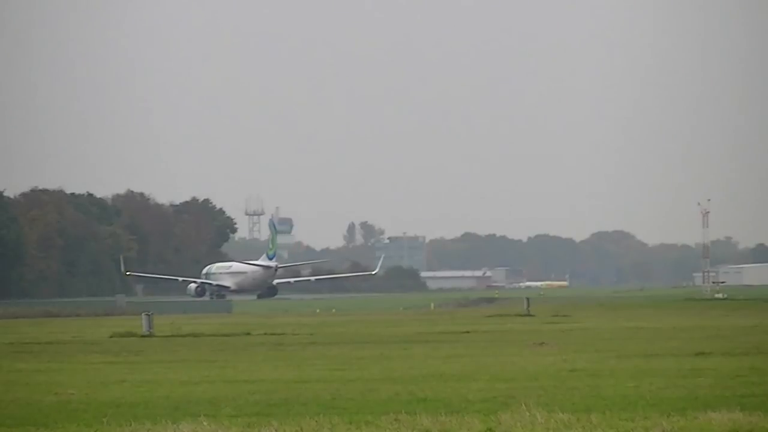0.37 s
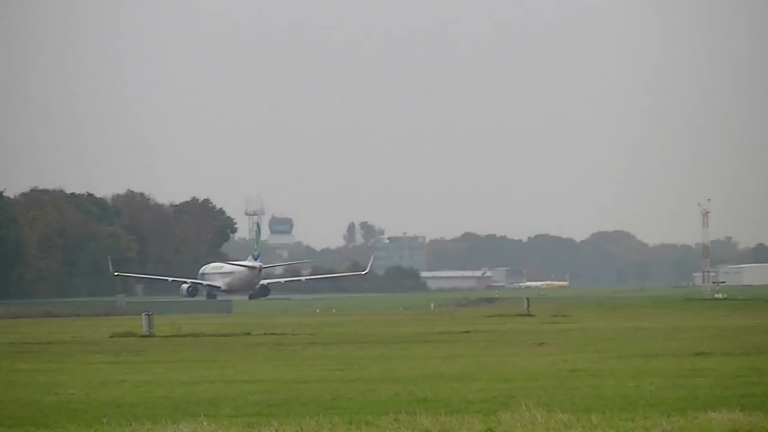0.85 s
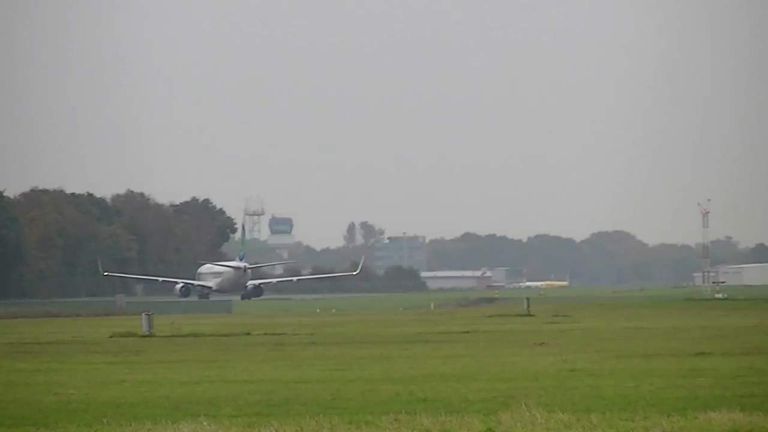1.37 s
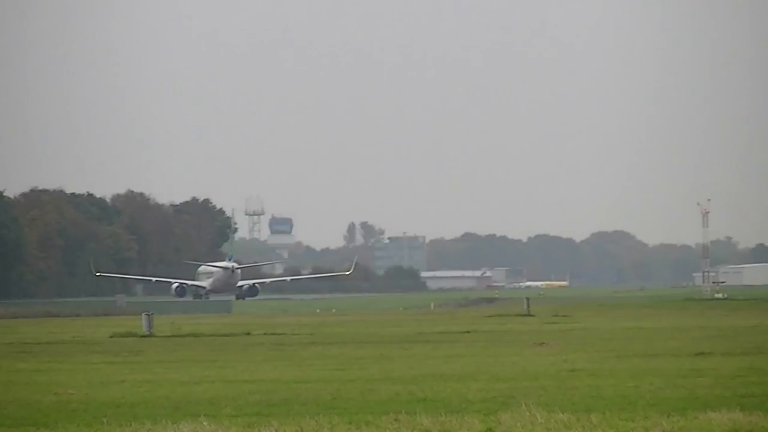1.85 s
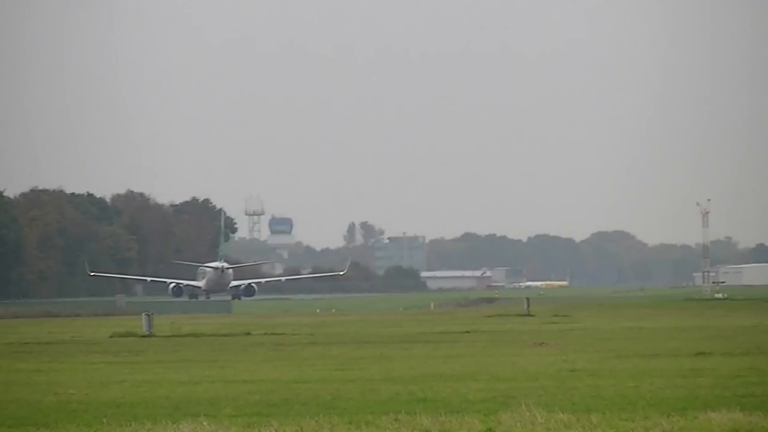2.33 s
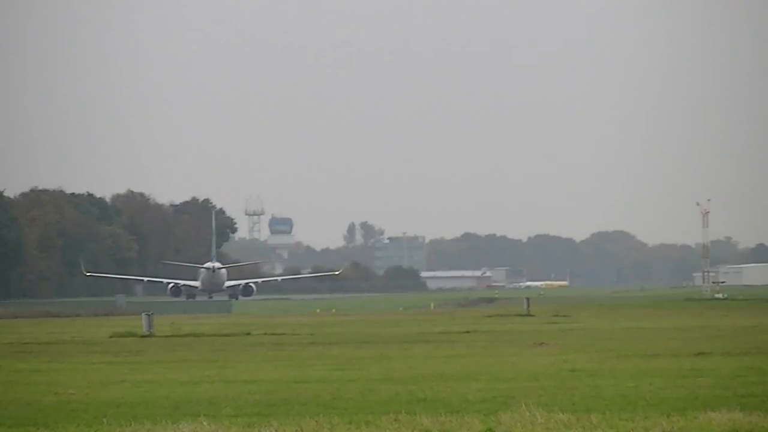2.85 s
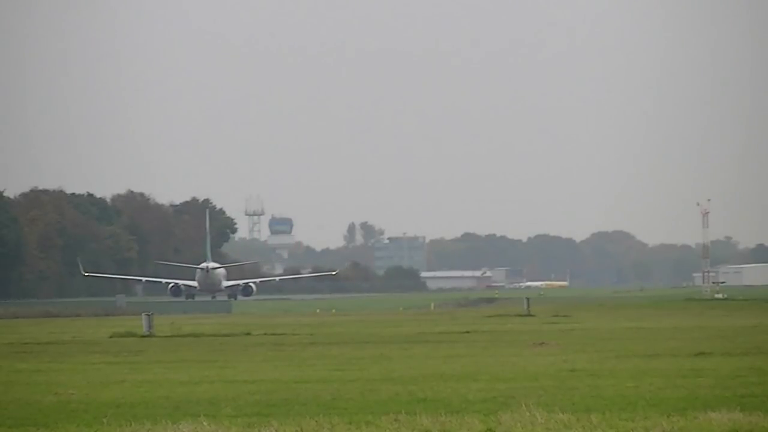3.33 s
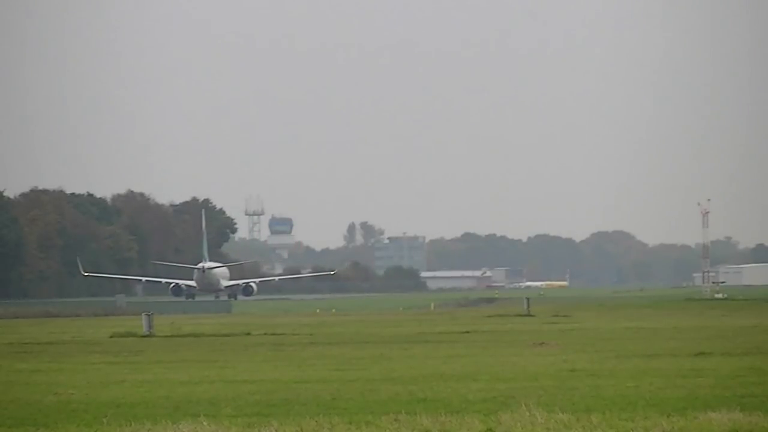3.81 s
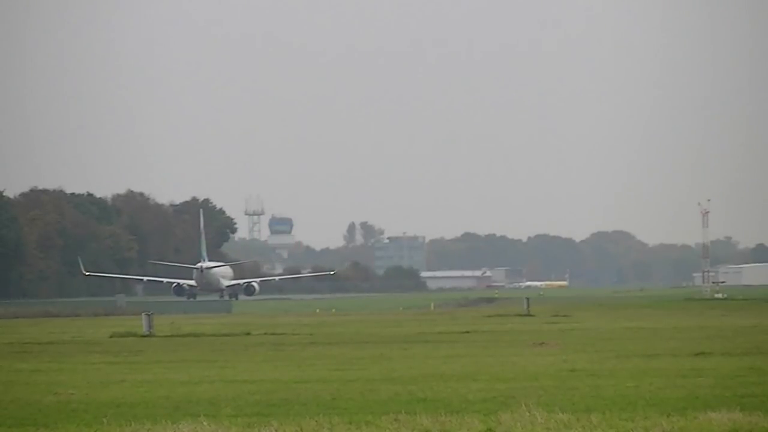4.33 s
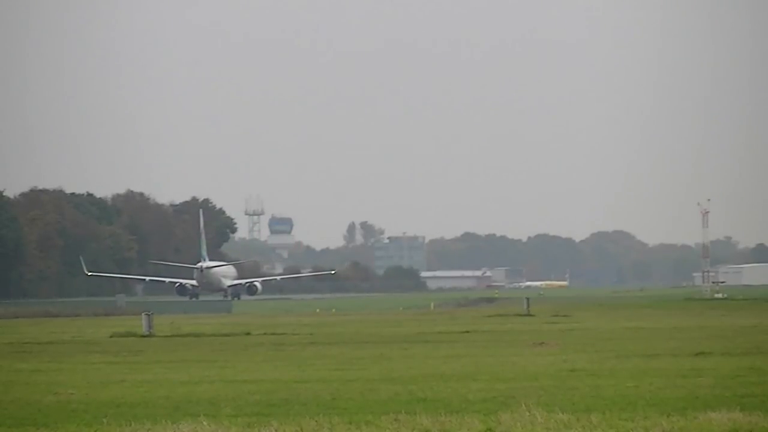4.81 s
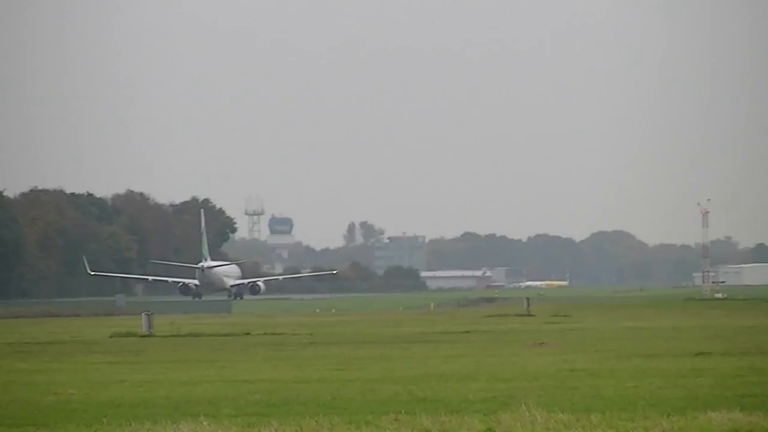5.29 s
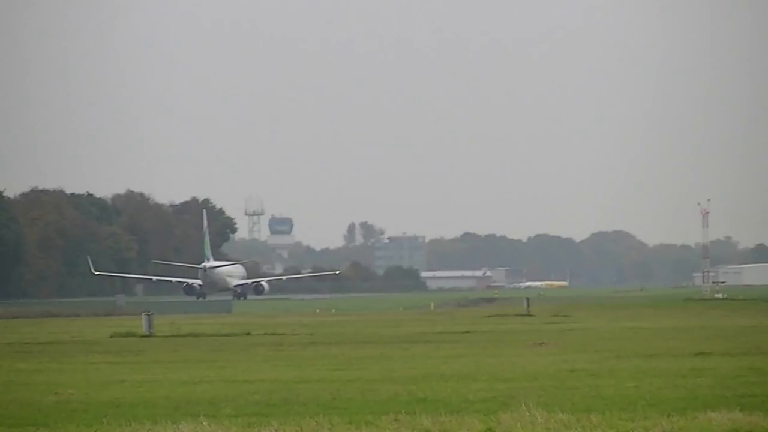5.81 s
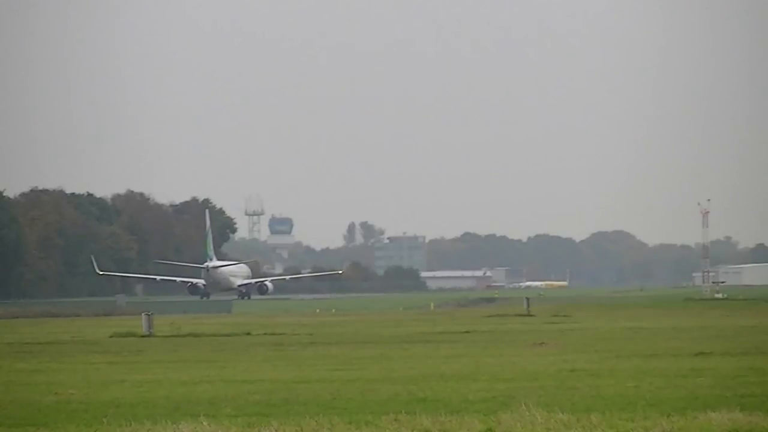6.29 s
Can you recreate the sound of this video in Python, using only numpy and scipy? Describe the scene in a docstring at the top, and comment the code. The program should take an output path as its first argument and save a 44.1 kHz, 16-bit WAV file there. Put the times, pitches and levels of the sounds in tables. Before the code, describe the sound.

Open airfield, heard by a small stereo camera in light wind. A far jet starts as faint rumble on the left, over steady soft hiss, and swells in uneven steps into a broad, crackling roar. Faint low drones waver beneath. Near the end it swings past the centre to the right, turns duller and hollow, and falls away.

```python
"""Across an airfield a jet's roar swells from the left, over a steady far rumble and hiss; low drones come and go.
Light wind buffets the two close ports of a small camera, whose matrix widens their difference.
The roar is shaped noise with one-signed crackle, combed by echoes off the ground and things close by.
Sharp shocks join in; as the jet turns its tail, the roar swings past the front to the right and dulls."""
import sys
import numpy as np
from scipy import signal
from scipy.io import wavfile
from scipy.ndimage import uniform_filter1d

SR = 44100
rng = np.random.default_rng(int(sys.argv[2]) if len(sys.argv) > 2 else 0)


def natural_amplitude(level_db):
    """Convert a level in decibels to a linear amplitude factor, elementwise."""
    exponent = np.asarray(level_db, float) / 20
    return 10 ** exponent


def bounce(signal):
    """Save signal as a 16-bit WAV file at the path given by the first command-line argument."""
    frames = np.transpose(np.atleast_2d(signal))
    limited = np.clip(frames, -1, 1)
    pcm = np.round(limited * 32767).astype(np.int16)
    wavfile.write(sys.argv[1], SR, pcm)


N = 282681


def evened(x):
    """Scales to rms 1."""
    return x / np.sqrt(np.mean(abs(x) ** 2) + 1e-20)


def read(points, hz):
    """Reads the columns of a table over log frequency."""
    f, *columns = np.transpose(points)
    return [np.interp(np.log(hz + 1), np.log(f + 1), c) for c in columns]


def follow(rows, t):
    """Reads the columns of a table over time."""
    s, *columns = np.transpose(rows)
    return [np.interp(t, s, c) for c in columns]


def spectra(x):
    """Short-time spectra, bins by frames."""
    return signal.stft(x, nperseg=1024, noverlap=768)[2]


def bins_hz():
    """Frequencies of the short-time bins, as a column."""
    return np.fft.rfftfreq(1024, 1 / SR)[:, None]


def sound(z):
    """Back from short-time spectra to a waveform."""
    return signal.istft(z, nperseg=1024, noverlap=768)[1][..., :N]


def below(hz, top_hz):
    """Gain of a gentle low-pass."""
    return 1 / np.sqrt(1 + (hz / top_hz) ** 4)


def band(x, centre_hz):
    """Keeps a band one and a half octaves wide."""
    edges_hz = [centre_hz * 0.43, centre_hz * 1.24]
    return signal.sosfilt(signal.butter(2, edges_hz, "band", fs=SR, output="sos"), x)


# delay across the ports in the bass; in the treble it lengthens and is more shaded
PORT_GAP_US, GAP_GROWTH_HZ, SHADE = 145, 25500, 0.29


def ports(hz, bearing):
    """Sum and difference of the two ports for a wave that reaches one before the other."""
    gap_s = PORT_GAP_US / 10 ** 6 * (1 + hz / GAP_GROWTH_HZ)
    lead = np.pi * hz * gap_s * (1 - 1j * SHADE) * bearing
    return np.array([np.cos(lead), 1j * np.sin(lead)])


# matrix on the port difference: [f/Hz, level/dB, phase/rad]
DIFFERENCE_MATRIX = [(410, 10.5, 0.21), (1120, 12.5, -0.18), (1950, 6.5, -0.87), (3380, -1, 0.28),
                     (4740, 9.5, 0.12), (6600, 3.5, -1.8), (8840, -4.5, -1.16), (15000.0, -5, 1)]


def widened(mid, side, hz):
    """The camera's matrix: reshapes the port difference, then adds and subtracts it for left and right."""
    db, turn = read(DIFFERENCE_MATRIX, hz)
    side = side * natural_amplitude(db) * np.exp(1j * turn)
    return sound(np.array([mid + side, mid - side]))


# colour of far airfield rumble and microphone hiss: [f/Hz, relative level/dB]
FIELD_COLOUR = [(30, -7.5), (170, 1.5), (500, -16), (900, -12.5), (1900, -21.5), (3000, -30.5),
                (5000, -34.5), (10000, -43), (15500, -49)]
FIELD_DB, FIELD_ALIKE_HZ = -56, 477  # rms level; the sides are more alike below this


def airfield():
    """Steady far rumble and hiss: shaped noise, its side part reduced in the bass."""
    mid, side = spectra(rng.standard_normal((2, N)))
    hz = bins_hz()
    side = side * (1 - 0.23 * below(hz, FIELD_ALIKE_HZ))
    colour = natural_amplitude(read(FIELD_COLOUR, hz)[0])
    return natural_amplitude(FIELD_DB) * evened(sound(colour * np.array([mid + side, mid - side])))


# wind flurries: [start t/s, length/s, level/dB, left over right/dB]
WIND_FLURRIES = [(0, 0.25, -38, -5), (0.334, 0.035, -42, -4.5), (0.921, 0.12, -46.5, -5.5),
                 (1.75, 0.28, -54, -2), (2.78, 0.13, -44, 4), (3.251, .075, -45.5, -2),
                 (3.52, 0.12, -42, 4.5), (3.799, 0.1, -35, 3.5), (3.949, 0.037, -40.5, 6.5),
                 (4.061, 0.095, -43.5, 6), (4.3, 0.206, -45.5, -3.5), (4.52, 0.28, -42, 3),
                 (4.79, 0.25, -46, -4)]
FLURRY_HZ, FLURRY_DB, FLURRY_OCTAVE_DB = 109.5, -44, 10.5  # pitch at this level; an octave up per so many dB
# faint puffs at random moments: mean length s, mean level dB, half-range of level and of lean dB
PUFF_COUNT, PUFF_S, PUFF_DB, PUFF_SPREAD_DB, PUFF_LEAN_DB = 10, 0.076, -64, 13, 4
# single wind thumps: [t/s, peak level/dB, left over right/dB]
WIND_THUMPS = [(0.954, -32, -3), (1.976, -37, -7), (3.457, -20, 4), (3.67, -38, -8), (3.864, -21.5, 4),
               (4.704, -28.5, 8), (5.346, -23, 6.5)]
THUMP_HZ = 136


def wind():
    """Eddies press on one port, so the matrix gives them in opposite phase left and right."""
    out = np.zeros((2, N + SR))
    when, size, lean = rng.random((PUFF_COUNT, 3)).T
    puff_db = PUFF_DB + PUFF_SPREAD_DB * (2 * size - 1)  # longer puffs are louder
    puffs = zip(when * N / SR, PUFF_S * (0.5 + size), puff_db, PUFF_LEAN_DB * (2 * lean - 1))
    rows = list(WIND_FLURRIES) + list(puffs)
    eddies = rng.standard_normal((len(rows), SR // 2))
    for (s, length, db, lean_db), eddy in zip(rows, eddies):
        at, count = round(max(s, 0) * SR), round(length * SR)
        hz = FLURRY_HZ * 2 ** ((db - FLURRY_DB) / FLURRY_OCTAVE_DB)
        settled = band(eddy, hz)[2000:]  # past the filter's onset
        lumps = evened(settled[:count]) * signal.windows.tukey(count, 0.3)
        out[:, at:at + count] += natural_amplitude([[db + lean_db / 2], [db - lean_db / 2]]) * lumps
    u = np.arange(-1500, 1500) / SR
    push = np.cos(2 * np.pi * THUMP_HZ * u + 0.5) * np.exp(-(2.3 * THUMP_HZ * u) ** 2)
    for s, db, lean_db in WIND_THUMPS:
        at = round(s * SR)
        out[:, at - 1500:at + 1500] += natural_amplitude([[db + lean_db / 2], [db - lean_db / 2]]) * push / push.max()
    return out[:, :N] * [[1], [-1]]


# low drones: [start t/s, end t/s, base f/Hz, partials [multiple of the base, rms level at the source/dB]]
LOW_DRONES = [(1.456, 3.302, 83.9, [(2, -59), (3, -63), (6, -68), (7, -68)]),
              (2.905, 4.7, 275.5, [(1, -58)]), (3.4, 4.6, 392, [(1, -61)]), (3.0, 5.9, 580, [(1, -59.5)]),
              (3.8, 5.3, 176.8, [(1, -63)]), (5.357, 6.6, 67.86, [(1, -55.5), (2, -46), (3, -50.5),
              (5, -46.5)])]
DRONE_WAVER_HZ, DRONE_FADE_S = 0.415, 0.17  # rms waver of the base, length of each fade


def drones():
    """Slightly wavering harmonic tones that fade in and out."""
    out, t = np.zeros(N), np.arange(N) / SR
    for start, end, hz, partials in LOW_DRONES:
        drift = evened(uniform_filter1d(rng.standard_normal(N), size=9000))
        fade = np.clip(np.minimum(t - start, end - t) / DRONE_FADE_S, 0, 1)
        turns = np.cumsum(hz + DRONE_WAVER_HZ * drift) / SR
        tones = sum(natural_amplitude(db) * np.sin(2 * np.pi * round(k) * turns) for k, db in partials)
        out += np.sqrt(2) * fade * tones
    return out


# crackle in the roar: [t/s, share 0-1 before its weighting over frequency]
CRACKLE_SHARE = [(0, 0.3), (5.4, 0.57), (6.41, 0.2)]
CRACKLES_PER_S, CRACKLE_SPREAD_DB, CRACKLE_LOW_HZ, CRACKLE_TOP_HZ = 420, 3.0, 720, 4970


def crackling_noise(noise, hz, t):
    """Jet turbulence as noise, partly replaced by random pulses that all point one way."""
    size = natural_amplitude(CRACKLE_SPREAD_DB * np.minimum(rng.exponential(1, N), 3))
    pulses = size * (rng.random(N) < CRACKLES_PER_S / SR)
    crackle = spectra(-evened(pulses))
    share = np.clip(follow(CRACKLE_SHARE, t)[0], 0, 1)
    share = share * (0.24 + 0.65 * below(hz, CRACKLE_TOP_HZ) ** 2)
    share = share * (1 - below(hz, CRACKLE_LOW_HZ) ** 2)
    return np.sqrt(1 - share) * noise + np.sqrt(share) * crackle


# basic colour of the roar: [f/Hz, level/dB]
ROAR_COLOUR = [(40.0, -32), (100.0, -8), (200.0, 1.5), (350.0, 0.26), (600.0, -2.5), (800.0, -5.5),
               (1100.0, -0.5), (1500.0, -1.5), (1900.0, -2.44), (2500.0, -6), (3500.0, -11),
               (5000.0, -31.5), (7000.0, -33.5), (10000.0, -37), (13000.0, -50.5), (16000.0, -72)]
# the roar as the exhaust swings round: [t/s, drive level/dB, treble level/dB, level near 3 kHz/dB]
EXHAUST_SWING = [(0.0, -52, -7, -1), (1.0, -45.5, -4.5, -0.2), (1.75, -38.5, -10.5, 0.5),
                 (2.1, -35, -0.5, -4.5), (2.7, -34.5, 1, 4), (3.3, -29.5, 0.2, 3.5),
                 (3.9, -24.5, -2.5, 0.4), (4.4, -23.5, -1.5, 0.8), (4.8, -23.5, 1.9, 2.2),
                 (5.1, -19.5, -7, 1.5), (5.4, -18, -6, -4), (5.65, -19.5, -1.5, -6),
                 (5.82, -20.5, -1.5, -8.5), (5.93, -19.5, -4.5, -18), (6.05, -21, -8, -15),
                 (6.2, -20.5, 0, -18.5), (6.41, -27, 5, -7)]
# bass against the drive: [t/s, level/dB]
BASS_LEVEL = [(0, 10.5), (2.1, -3.5), (3.3, -2.5), (3.9, -6.5), (4.8, -0.5), (5.3, -3.5), (6.2, -0.5),
              (6.41, 4)]
# bands combing the roar, sinking as the exhaust swings past: [t/s, one band f/Hz, spacing/Hz, depth/dB]
HOLLOW_BANDS = [(0.3, 3040, 1280, 3), (2.5, 3130, 1260, 1.5), (3.6, 2910, 1130, 3.5),
                (4.2, 2840, 1050, 2.5), (4.7, 2300, 1160, -0.5), (5.05, 2130, 1170, -0.5),
                (5.35, 1630, 1100, 5), (5.7, 1280, 910, 5), (6.05, 1160, 890, -1), (6.41, 720, 880, 5.5)]
HOLLOW_CENTRE_HZ, HOLLOW_REACH_HZ = 2300, 1300  # where the combing is deepest, and how far it reaches


def roar_gain(hz, t):
    """The roar's level and colour shift as the aircraft turns; air turbulence makes them patchy."""
    drive_db, treble_db, presence_db = follow(EXHAUST_SWING, t)
    colour_db = treble_db * (1 - below(hz, 3400) ** 2)
    colour_db = colour_db + follow(BASS_LEVEL, t)[0] * below(hz, 640) ** 2
    colour_db = colour_db + presence_db * np.exp(-(np.log2((hz + 1) / 3000) / 0.86) ** 2)
    hollow_hz, spacing_hz, hollow_db = follow(HOLLOW_BANDS, t)
    reach = np.exp(-((hz - HOLLOW_CENTRE_HZ) / HOLLOW_REACH_HZ) ** 2)
    colour_db = colour_db + hollow_db * np.cos(2 * np.pi * (hz - hollow_hz) / spacing_hz) * reach
    patches = rng.standard_normal((len(t), len(hz))).T
    patches = uniform_filter1d(patches, size=14, axis=0)  # smooth over frequency
    patches = evened(uniform_filter1d(patches, size=12, axis=1))  # smooth over time
    flicker = rng.standard_normal(len(t)) * (1 - below(hz, 1500))  # the treble flickers
    return natural_amplitude(read(ROAR_COLOUR, hz)[0] + drive_db + colour_db + 0.67 * patches + 1.1 * flicker)


# sharp shocks: [t/s, peak level before the high-pass/dB]
SHARP_SHOCKS = [(4.0197, -52), (4.0835, -42), (4.2112, -52), (4.5475, -47), (4.7555, -48), (5.2249, -53),
                (5.2673, -53), (5.4544, -50), (5.5317, -50), (5.6086, -42)]
SHOCK_LOW_HZ = 6000


def shock_spectra(hz):
    """Sharp pressure shocks: single negative pulses with the lows taken off."""
    shocks = np.zeros(N)
    for s, db in SHARP_SHOCKS:
        shocks[round(s * SR)] = -natural_amplitude(db)
    return spectra(shocks) * (1 - below(hz, SHOCK_LOW_HZ) ** 2)


def arrival(hz, ms, turn):
    """Phase of an echo after its delay and a fixed turn."""
    return np.exp(1j * (turn - 2 * np.pi * hz * ms / 1000))


# direction of the jet: [t/s, bearing from 1 left to -1 right]
JET_BEARING = [(0, 0.58), (2.5, 0.66), (4.8, 0.67), (5.2, 1), (5.85, 0.31), (6.41, -0.54)]
# both moving echoes lengthen steadily as the aircraft rolls: delay at the start, doubling time, gain
GROUND_MS, GROUND_DOUBLES_S, GROUND_GAIN = 0.3175, 3.98, 0.18
GROUND_BEARING, GROUND_TURN, GROUND_TOP_HZ = -0.14, -1.06, 4640  # share of bearing, phase rad, soft grass cut
NEAR_MS, NEAR_DOUBLES_S, NEAR_GAIN = 0.689, 6.1, 0.21
NEAR_BEARING, NEAR_TURN, NEAR_TOP_HZ = 0.037, -2.07, 2340  # duller, from ahead: bearing, phase rad, cut
# still echoes from things near the camera: [delay/ms, gain, phase/rad, bearing, top f/Hz]
STILL_ECHOES = [(1.79, 0.15, 0.091, 0.54, 1450), (2.61, 0.28, 3.59, 0.33, 594)]


def paths_to_ports(hz, t):
    """Direct sound and delayed, duller echoes add at the ports and comb the roar."""
    bearing = follow(JET_BEARING, t)[0]
    ground_ms = GROUND_MS * 2 ** (t / GROUND_DOUBLES_S)
    near_ms = NEAR_MS * 2 ** (t / NEAR_DOUBLES_S)
    ground = GROUND_GAIN * below(hz, GROUND_TOP_HZ) * arrival(hz, ground_ms, GROUND_TURN)
    near = NEAR_GAIN * below(hz, NEAR_TOP_HZ) * arrival(hz, near_ms, NEAR_TURN)
    paths = ports(hz, bearing) + ground * ports(hz, GROUND_BEARING * bearing)
    paths = paths + near * ports(hz, NEAR_BEARING)
    for ms, strength, turn, side, top_hz in STILL_ECHOES:
        paths = paths + strength * below(hz, top_hz) * arrival(hz, ms, turn) * ports(hz, side)
    return paths


# sound unrelated at the ports, before the difference is narrowed: [f/Hz, level against the roar/dB]
SCATTERED_SOUND = [(200, -16), (3000, -14), (7000, -9), (10000, -5.5), (15000, -1)]


def engine():
    """Crackling roar, drones and shocks reach the ports together, with some scattered roar."""
    noise = spectra(rng.standard_normal((3, N)))
    hz, t = bins_hz(), np.arange(noise.shape[2]) * 256 / SR
    gain = roar_gain(hz, t)
    roar = gain * crackling_noise(noise[0], hz, t)
    wave = roar + spectra(drones()) + shock_spectra(hz)
    scattered = gain * natural_amplitude(read(SCATTERED_SOUND, hz)[0]) * noise[1:]
    scattered[1] *= abs(ports(hz, 1.08)[1])  # narrows the difference most in the bass
    mid, side = wave * paths_to_ports(hz, t) + scattered
    return widened(mid, side, hz)


def scene():
    """Far airfield, wind and engine together."""
    return airfield() + wind() + engine()


def band_limit(x):
    """A steep low-pass at the top of the band."""
    return signal.sosfilt(signal.butter(12, 15720, fs=SR, output="sos"), x)


def record(dry):
    """The camera's rumble filter takes off the lowest bass."""
    rumble_filter = signal.butter(2, 45, "high", fs=SR, output="sos")
    mix = signal.sosfilt(rumble_filter, dry)
    return band_limit(mix)


dry = scene()
out = record(dry)
bounce(out)
```